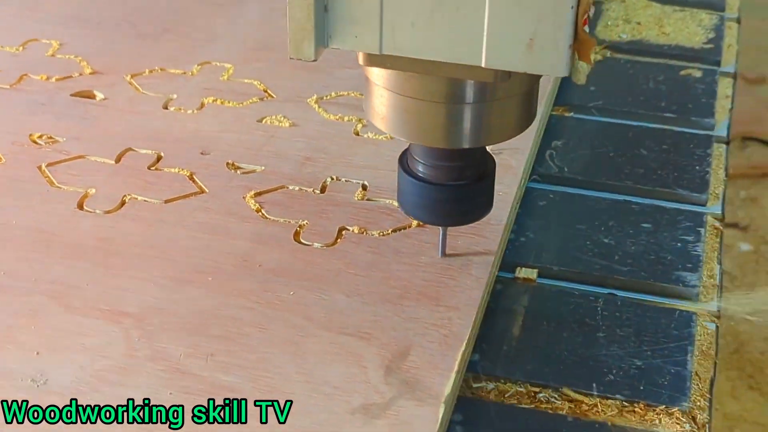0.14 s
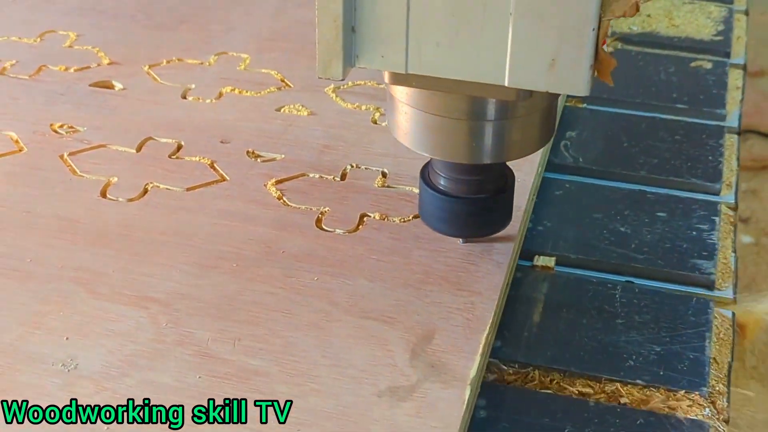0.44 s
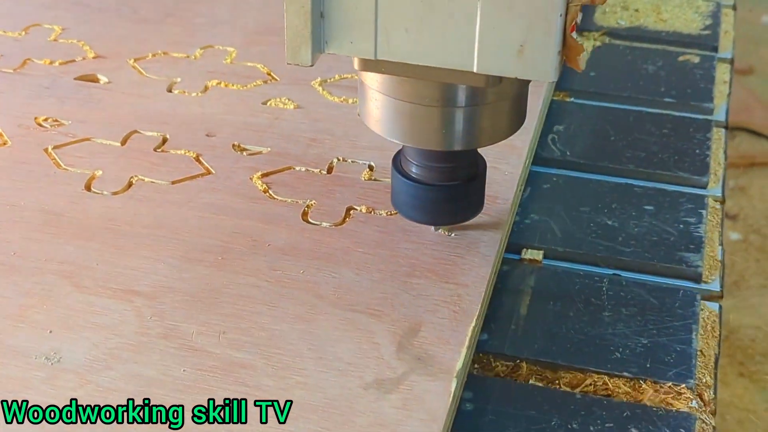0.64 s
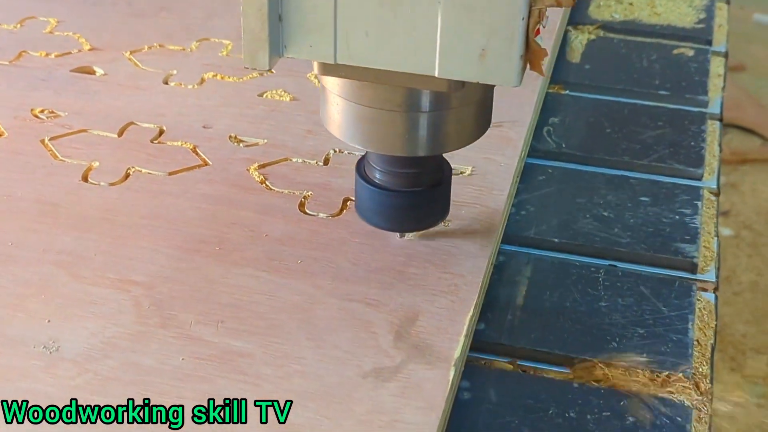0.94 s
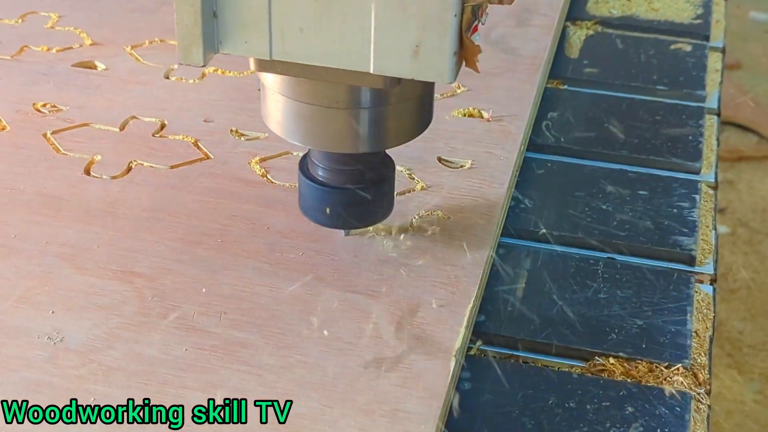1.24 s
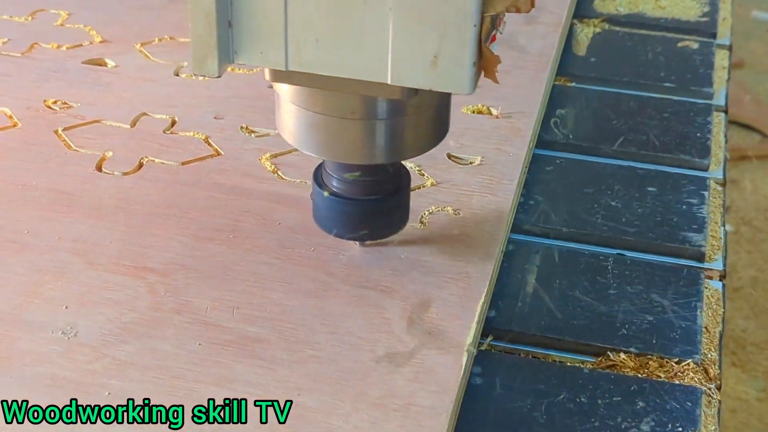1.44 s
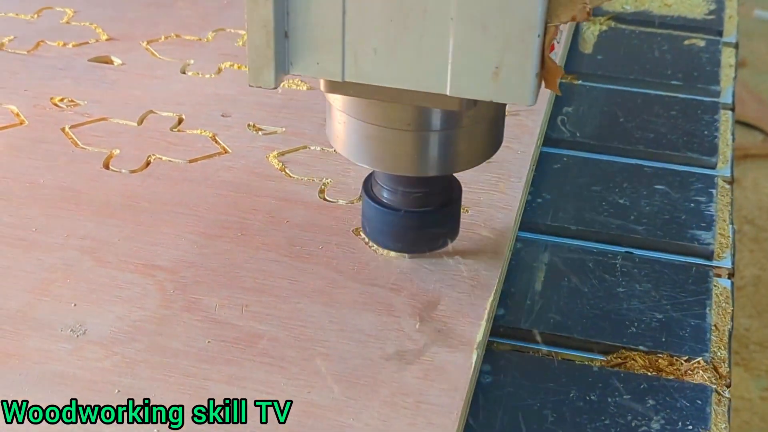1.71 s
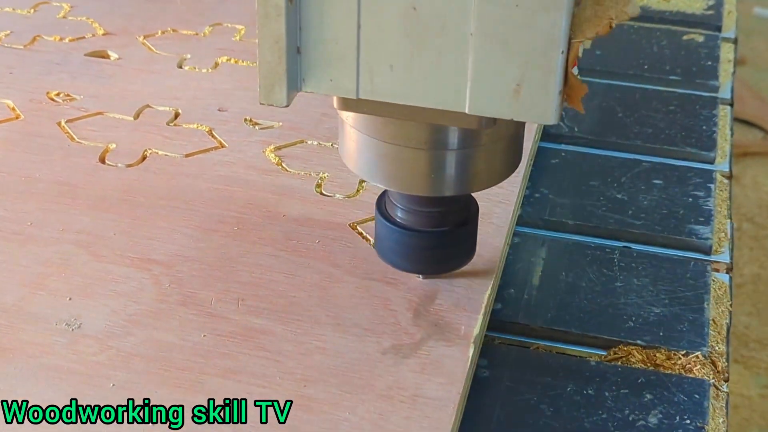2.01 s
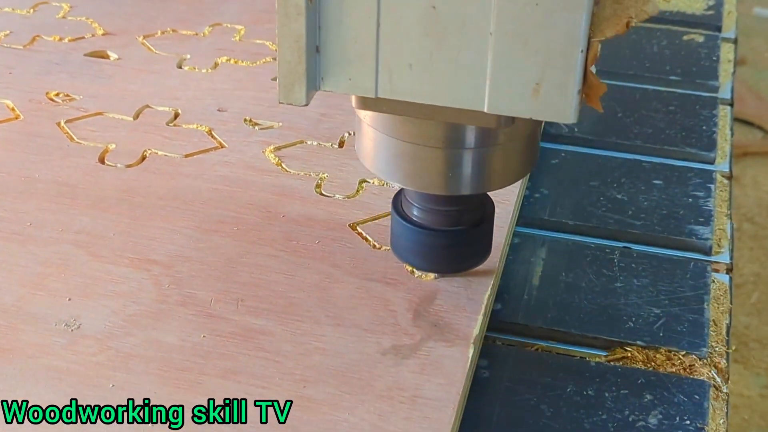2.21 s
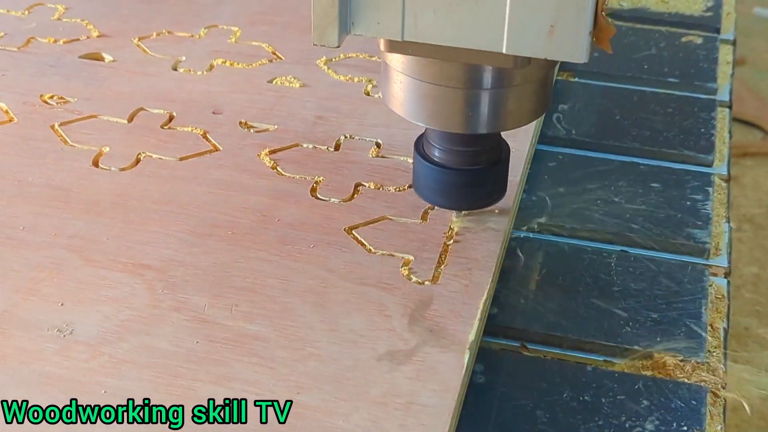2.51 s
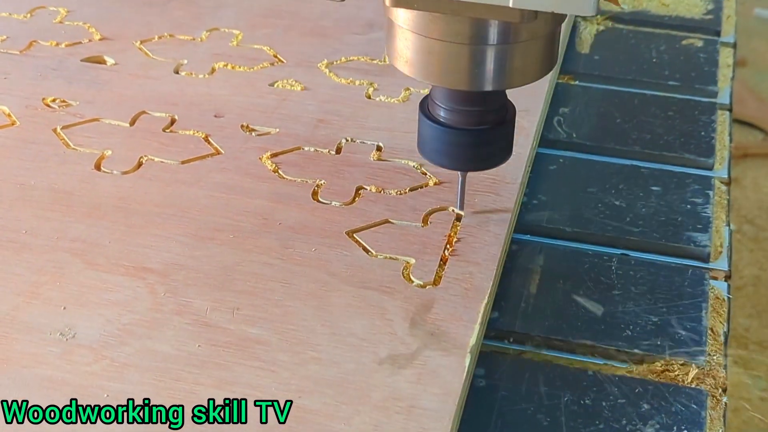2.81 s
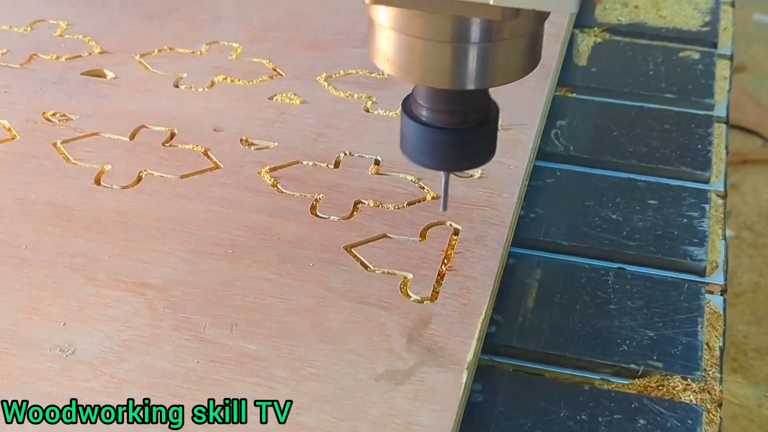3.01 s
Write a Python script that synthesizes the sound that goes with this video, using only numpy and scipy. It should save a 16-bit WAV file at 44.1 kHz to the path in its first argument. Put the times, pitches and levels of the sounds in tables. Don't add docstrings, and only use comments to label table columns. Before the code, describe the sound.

A router spindle runs throughout with a dense, airy, metallic roar, strongest in the mid and upper mids, close in a workshop. At about 0.5 s the bit plunges into the wooden sheet, adding a rough, wavering low hum, dull shudder and faint bright chip ticks. A thin high squeal sounds around 1.95-2.25 s. The hum swells near 2.5 s, stops by 2.7 s as the bit lifts, and the roar continues to the end.

```python
import sys
import numpy as np
from scipy import signal
from scipy.fft import rfft, irfft, next_fast_len
from scipy.io import wavfile
from scipy.ndimage import uniform_filter1d

SR = 44100
rng = np.random.default_rng(int(sys.argv[2]) if len(sys.argv) > 2 else 0)


def invert_db(x):
    u = np.asarray(x, float) / 20
    return 10 ** u


def generate_wav(signal):
    frames = np.transpose(np.atleast_2d(signal))
    scaled = np.clip(frames, -1, 1) * 32767
    pcm = np.round(scaled).astype(np.int16)
    wavfile.write(sys.argv[1], SR, pcm)


N = 138915
T = np.arange(N) / SR
M = next_fast_len(N)
HZ = np.maximum(np.arange(M // 2 + 1) * SR / M, 1)
LAG_S = 0.000291
BITE_MEAN_DB = -44

# time_s, nearness [-0.6 to 1]
HEAD_SWING = [(0, .1), (.7, .1), (.95, .7), (1.25, 1), (1.5, .6), (1.75, .6), (2.0, .2), (2.6, .1),
              (2.75, -.6), (2.9, .3), (3.15, .4)]


def rms_one(x):
    return x / np.sqrt(np.mean(x ** 2) + 1e-20)


def in_time(rows):
    return np.interp(T, *np.transpose(rows))


def at_hz(points):
    hz, value = np.transpose(points)
    return np.interp(np.log(HZ), np.log(hz), value)


def drift(rate):
    r = np.exp(-80 * np.pi * rate / SR)
    noise = rng.standard_normal(N // 40 + 2002)
    slow = signal.lfilter([1], [1, -2 * r, r * r], noise)[2000:]
    return np.interp(np.arange(N) / 40, np.arange(len(slow)), rms_one(slow))


def pair(shape, lag_rad, alike):
    a, b = rng.standard_normal((2, len(HZ))) + 1j * rng.standard_normal((2, len(HZ)))
    right = alike * a * np.exp(-1j * lag_rad) + np.sqrt(1 - alike ** 2) * b
    return irfft(np.array([a, right]) * shape, M)[:, :N] * np.sqrt(M * SR) / 2


def air_rush(alike, together):
    # pitch_hz, level_db [per Hz]
    air_spectrum = [(25, -116), (60, -100), (110, -90), (230, -87), (400, -73), (1200, -73.5), (4800, -84),
                    (7000, -79.5), (12500, -112)]
    lag_rad = 2 * np.pi * HZ * LAG_S * np.clip(HZ / 1500, 0, 1)
    return pair(invert_db(at_hz(air_spectrum)), lag_rad, alike) * invert_db(1.2 * together)


def resonance(hz, width_hz, top_db, lag_rad, alike):
    shape = invert_db(top_db) / (1 + (1.378 * (HZ - hz) / width_hz) ** 2)
    return pair(shape, lag_rad + 3.0 * np.pi * (HZ - hz) * LAG_S, alike)


def roar():
    # pitch_hz, width_hz, top_db [per Hz], right_lag_rad, gain_under_load_db
    housing = [(294, 56, -78, 1, 1.5), (473.6, 40.6, -64, 0.85, 1), (703, 87, -60, .5, 0),
               (790, 85, -60.5, .5, -1), (928, 98, -67.5, 0.4, 1), (1156, 44, -70, 3, 2),
               (1315, 43, -67.5, 4, -3.5), (1480, 58, -67, 2, -4), (1575, 86, -64, 1.5, -5.5),
               (1736, 75, -60.5, 3, -4), (1885, 184, -61, 3.5, -4), (2214, 90, -60.5, -1.2, -3.5),
               (2567, 125, -59, 0.75, -2), (4770, 28, -64.5, -2.5, -6)]
    # pitch_hz, width_hz, top_db [per Hz], right_lag_rad, gain_when_near_db
    gantry = [(3127, 195, -65.5, 1.33, 0.5), (3208, 113, -60, -0.06, -4.5), (3270, 53, -58, 1.56, -2.5),
              (3460, 99, -67.5, -3, 7.5), (3814, 226, -68, 0.5, 5.5), (4210, 150, -66, 1.4, 2.5),
              (4416, 106, -69.5, -5.3, 2.5), (4705, 106, -68.5, -3, -1.5), (2598, 26, -58, 1, -11),
              (5195, 440, -74, -0.5, 1), (5940, 360, -73, -8, 6), (6425, 224, -72.5, -0.8, 3),
              (9110, 600, -86, 1, 3), (9700, 430, -100, -10.5, 6)]
    # time_s, load [0-1]
    motor_load = [(0, .2), (.25, 0), (.36, .7), (.6, .6), (1.25, 1), (1.55, .6), (2.0, .8), (2.55, .6),
                  (2.72, 0), (3.15, .1)]
    # pitch_hz, likeness [0-1]
    likeness = [(190, .998), (300, 0.66), (780, 0.97), (1300, 0.51), (3100, 0.71), (3800, 0.32),
                (6450, 0.42), (9000, 0.1)]
    patchy_db = 1.5
    alike = np.clip(at_hz(likeness), 0, .999)
    together = drift(20)
    out = air_rush(alike, together)
    for modes, drive in ((housing, in_time(motor_load)), (gantry, in_time(HEAD_SWING))):
        for hz, width_hz, top_db, lag_rad, gain_db in modes:
            wander = 0.05 * together + 0.067 * drift(2.0) + drift(26.3)
            body = resonance(hz, width_hz, top_db, lag_rad, alike)
            out += body * invert_db(gain_db * drive + patchy_db * wander)
    return out


def turns():
    spindle_hz, speed_wobble = 298.2, .0045
    return 2 * np.pi * np.cumsum(spindle_hz * (1 + speed_wobble * drift(15.7))) / SR


def sheet_shudder():
    # time_s, level_db
    shudder_level = [
        (.46, -82),
        (.5, -61.5),
        (.7, -66),
        (.9, -62),
        (1.4, -66),
        (2.0, -60.5),
        (2.24, -63),
        (2.3, -77),
        (2.8, -66),
        (3.0, -69),
    ]
    low = signal.butter(2, [70, 180], "band", fs=SR, output="sos")
    rumble = rms_one(signal.sosfilt(low, rng.standard_normal(N)))
    return rumble * invert_db(in_time(shudder_level) + 2.4 * drift(9.2))


def flute_tones(phase, bite, cutting):
    multiples = [1, 2, 3, 4, 6]
    # level_db [to flute tone], share of bite followed [0-1], wander_db,
    # right_lag_rad, extra_lag_when_near_rad
    orders = [
        (-11, .4, 2, 1.2, .1),
        (3, 1, .6, 1.3, 1.6),
        (-4, 0, 2.5, .7, 0),
        (-7, .5, 2, 3, 0),
        (-10, 1, 2.5, 2, 0),
    ]
    swing, out = in_time(HEAD_SWING), 0
    for k, (db, follows, wander_db, lag_rad, near_rad) in zip(multiples, orders):
        lag = np.array([[0], [1]]) * (lag_rad + near_rad * swing + 0.21 * drift(1.4))
        wander = wander_db * (drift(5) + drift(18))
        level = cutting * invert_db(BITE_MEAN_DB + db + follows * (bite - BITE_MEAN_DB) + wander)
        out = out + np.sqrt(2) * level * np.sin(k * phase + .45 * drift(25) - lag)
    return out


def chip_spray():
    chips_db, chips_per_s = -14.5, 1100
    struck = rng.random((2, N)) < chips_per_s / SR
    strength = invert_db(2.7 * np.minimum(rng.exponential(1, (2, N)), 4))
    clicks = struck * strength * rng.choice([-1, 1], (2, N))
    bright = signal.butter(2, [3500, 7500], "band", fs=SR, output="sos")
    ticks = rms_one(signal.sosfilt(bright, clicks + 1e-18))
    return ticks * invert_db(BITE_MEAN_DB + chips_db + drift(6.2))


def cutter(phase):
    # time_s, flute_tone_db
    bite_level = [(.46, -75), (.53, -44), (.66, -48), (.85, -41), (1.0, -43), (1.15, -48), (1.27, -44),
                  (1.33, -52), (1.48, -41), (1.6, -50), (1.77, -48), (1.85, -40), (1.98, -39), (2.08, -46),
                  (2.22, -45), (2.33, -39), (2.52, -36), (2.68, -75)]
    bite = in_time(bite_level)
    cutting = np.clip((bite + 75) / 22, 0, 1)
    return flute_tones(phase, bite, cutting) + sheet_shudder() + cutting * chip_spray()


def chatter(phase):
    # start_s, length_s, level_db
    spells = [
        (1.95, .15, -44),
        (2.07, .2, -44),
    ]
    # turns_off_centre, level_db
    sidebands = [(-3, -6), (-1, -4), (0, 0), (1, -4), (2, -7)]
    mode_hz, edge_s = 6160, .03
    level = 0
    for start_s, length_s, db in spells:
        to_edge_s = np.minimum(T - start_s, start_s + length_s - T)
        level = level + invert_db(db) * np.clip(to_edge_s / edge_s, 0, 1)
    mode = 2 * np.pi * np.cumsum(mode_hz * (1 + 0.00234 * drift(28))) / SR
    squeal = 0
    for k, db in sidebands:
        lag = np.array([[0], [rng.uniform(0, 7.2)]])
        squeal = squeal + invert_db(db + 2 * drift(12)) * np.sin(mode + round(k) * phase - lag)
    return level * squeal


def scene():
    phase = turns()
    left_right_db = np.array([[.2], [-.2]])
    return (roar() + cutter(phase) + chatter(phase)) * invert_db(left_right_db)


def roll_off(x):
    return signal.sosfilt(signal.butter(12, 12550, fs=SR, output="sos"), x)


def record(dry):
    # pitch_hz, width_hz, depth [0-1]
    notches = [(1235, 30, .5), (9520, 280, .5), (10920, 130, .4), (12500, 200, .7)]
    # low_hz, high_hz, chance needed [spreads]; a row with low_hz above high_hz is
    dropouts = [(8600, 9700, 1.7), (9700, 8200, 3.2), (10100, 11000, 0.76), (11000, 9900, 1.5),
                (11940, 12600, .3)]
    rumble_cut_hz = 92
    flutter_hz, flutter_depth, flutter_rad, flutter_from_hz = SR / 1024, 0.16, 0.22, 1400
    spectrum = rfft(dry, M) / np.sqrt(1 + (rumble_cut_hz / HZ) ** 4)
    for hz, width_hz, depth in notches:
        spectrum = spectrum * (1 - np.clip(depth, 0, 1) / (1 + ((HZ - hz) / width_hz) ** 2))
    out = irfft(spectrum, M)[:, :N]
    treble = irfft(spectrum / (1 + (flutter_from_hz / HZ) ** 4), M)[:, :N]
    out = out + flutter_depth * np.cos(2 * np.pi * flutter_hz * T + flutter_rad) * treble
    for low_hz, high_hz, needed in dropouts:
        gone = uniform_filter1d(1. * (drift(9) > needed), size=1024)
        band = irfft(spectrum * (HZ >= low_hz) * (HZ < high_hz), M)[:, :N]
        out = out - gone * band
    return roll_off(out)


dry = scene()
out = record(dry)
generate_wav(out)
```